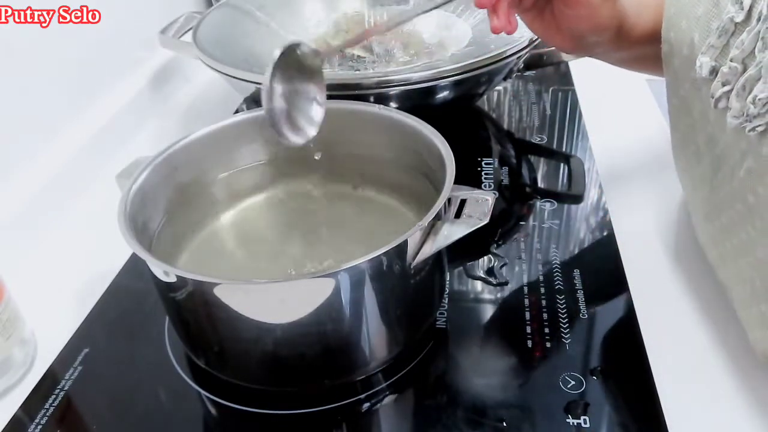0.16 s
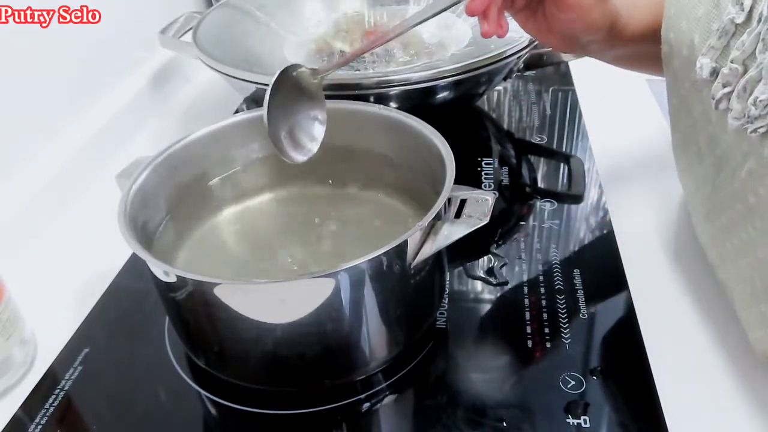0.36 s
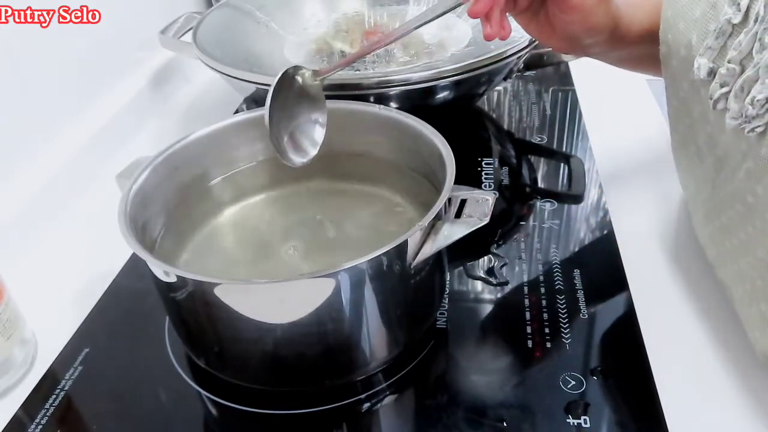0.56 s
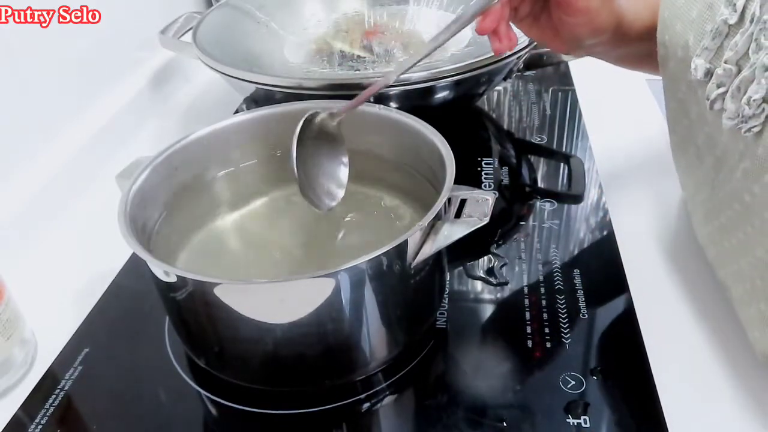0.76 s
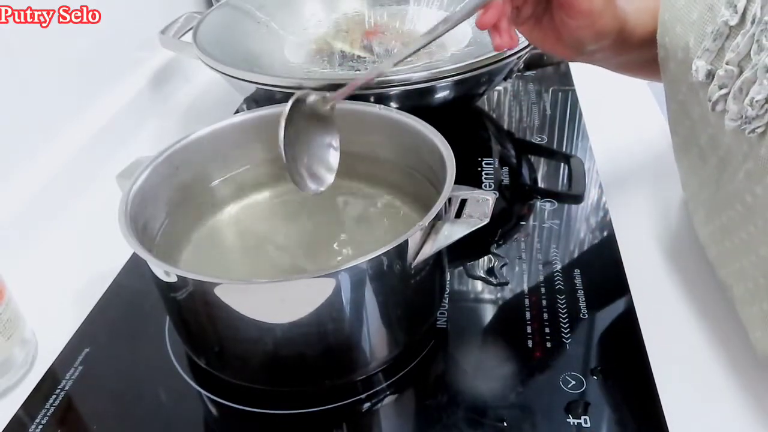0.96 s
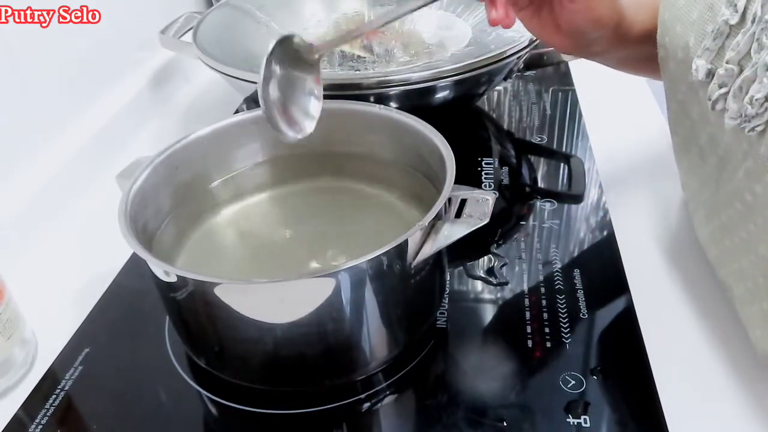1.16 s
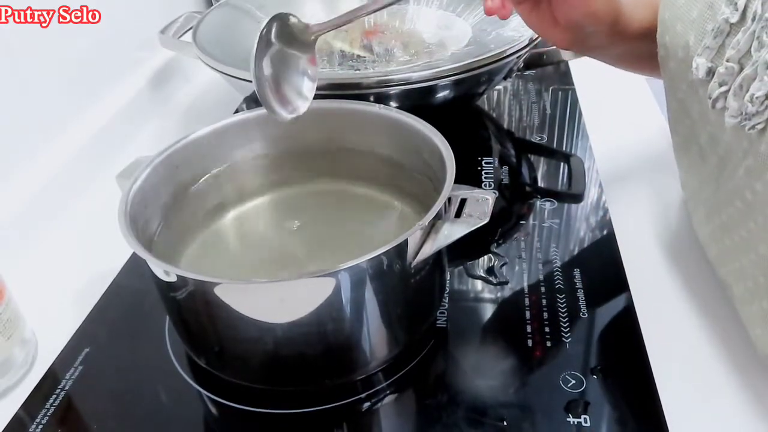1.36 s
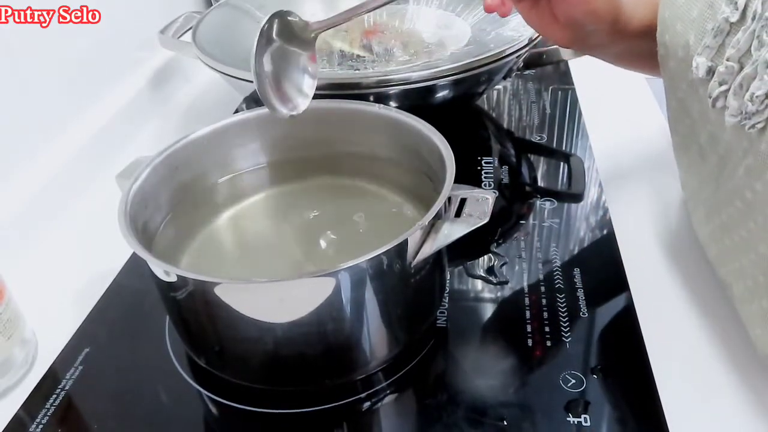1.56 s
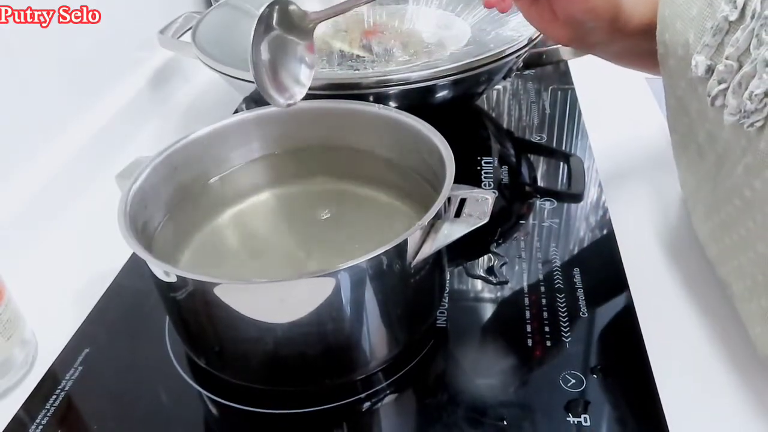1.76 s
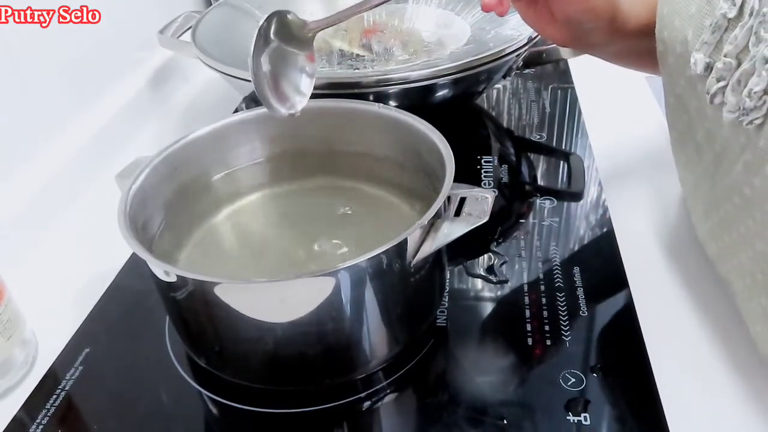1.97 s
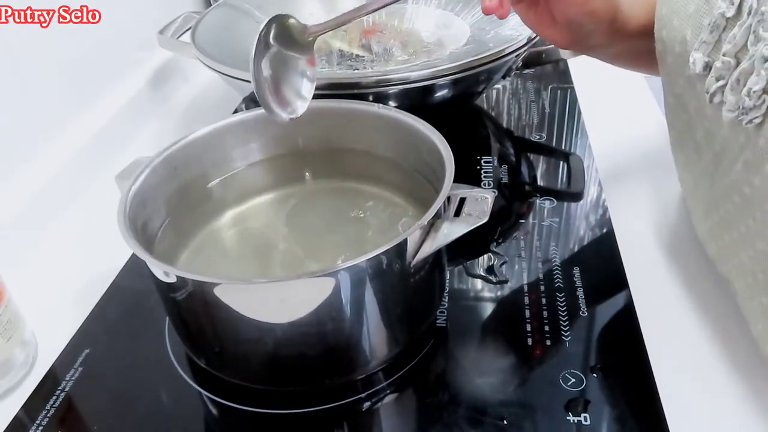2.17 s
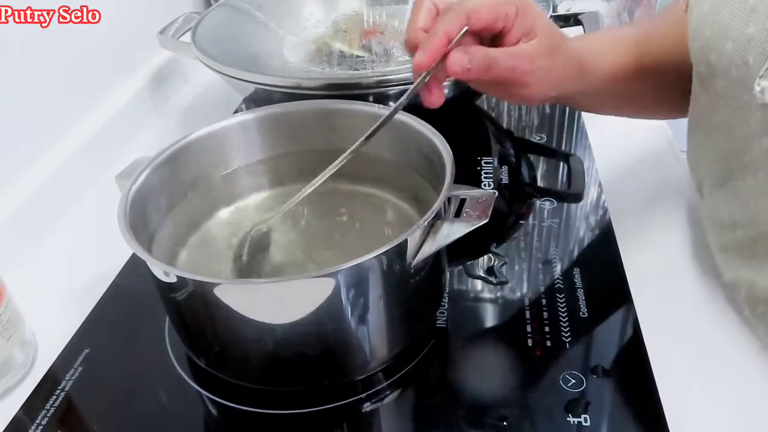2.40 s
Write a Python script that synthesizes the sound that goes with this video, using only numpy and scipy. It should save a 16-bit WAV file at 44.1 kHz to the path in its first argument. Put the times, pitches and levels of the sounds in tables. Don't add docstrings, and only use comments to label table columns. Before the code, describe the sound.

Low continuous hum from a cooking hob, fans and a motor fills a small indoor kitchen, with dull air rumble and light hiss. A knock tail, one sharp tick on the worktop, then a tiny crackle, picked up nearby.

```python
import sys
import numpy as np
from scipy import signal
from scipy.fft import rfft, irfft, next_fast_len
from scipy.io import wavfile
from scipy.ndimage import uniform_filter1d, map_coordinates

SR = 44100
rng = np.random.default_rng(int(sys.argv[2]) if len(sys.argv) > 2 else 0)


def store_pcm(level_fs):
    pcm = np.round(np.clip(level_fs, -1, 1) * 32767).astype(np.int16)
    wavfile.write(sys.argv[1], SR, np.atleast_2d(pcm).T)


def magnitude_from_level(level_db):
    exponent = np.asarray(level_db, float) / 20
    return 10 ** exponent


N = 107427
TIME = np.arange(N) / SR
HIT_TIME = np.arange(SR // 2) / SR

MOTOR_OVERTONES = {1: -46.7, 2: -32.6, 3: -36.6, 4: -55, 7: -65, 8: -45.5, 9: -53.3, 10: -55, 12: -63, 15:
                   -63, 20: -60, 21: -65.5, 25: -71}
FAN_OVERTONES = {1: -26.4, 2: -67, 3: -61.5, 4: -57.5, 5: -66, 6: -68, 7: -69, 8: -62, 9: -66}
SMALL_FAN_OVERTONES = {1: -70.5, 2: -59, 3: -49.5}
COIL_OVERTONES = {1: -44.7, 5: -67, 9: -62.5, 10: -67.5, 12: -71.5, 13: -68, 15: -69, 20: -67.6, 23: -71.5,
                  24: -72, 26: -76, 28: -76.5, 46: -83.1, 57: -82.9}
# f/Hz, level/dB rms, lead/s
FAR_MACHINES = [(104.554, -44.2, .005), (94.65, -50, .00425), (142, -53.3, .0054), (153.59, -53.5, .0003),
                (107.8, -55, .0079), (82.7, -57, .001), (87, -57, .0001), (54.8, -57, .0064),
                (471, -59, .001), (693.9, -64, .001)]
# f/Hz, level/dB per Hz
AIR_RUMBLE = [(16, -77), (33, -78), (52, -61.5), (75, -70), (100, -66), (145, -70), (170, -66.5),
              (240, -87)]
# f/Hz, level/dB per Hz
AIR_BODY = [(150, -100), (230, -81), (290, -72), (800, -73.5), (1300, -82), (2400, -85.5), (3600, -104),
            (8000, -140)]
# f/Hz, width/Hz, level/dB
DUCT_BUMPS = [(461, 44, 8.5), (595, 72, 3.5), (510, 19, -5), (365, 24, -4), (419, 22, -0.5)]
# f/Hz, level/dB per Hz
AIR_HISS = [(1000, -110), (3500, -101), (5300, -100), (7800, -105), (10000, -110), (13000, -114),
            (15000, -120), (15800, -128)]
# f/Hz, side over mid level/dB
AIR_WIDTH = [(170, -43.5), (240, -6.5), (460, -16), (900, -9), (2100, -10), (3500, -2.5), (9000, -3),
             (15000, 0.5)]
# f/Hz, level/dB, t60/s
KNOCK_MODES = [(272.3, -22, 0.11), (276.3, -31, 0.49), (291.4, -31.5, 0.33), (486, -30.5, 0.099),
               (834, -36.5, 0.23), (886, -34, 0.086), (1993, -34, 0.11), (1870, -36.5, 0.097),
               (2060, -39.5, 0.093)]
# f/Hz, level/dB, t60/s
TICK_MODES = [(2105, -36, .03), (2380, -32, .03), (2490, -16.5, .03), (2780, -34, .015), (3050, -18, .006),
              (3700, -42, .04)]
# t/s, peak level/dB, centre f/Hz, t60/s
CRACKLE_BURSTS = [(.098, -34, 3500, .045), (.098, -43, 6300, .04), (.098, -51, 11500, .045),
                  (.7932, -38, 5900, .005), (.7932, -34, 4000, .004), (.7985, -59, 14000, .015),
                  (.800, -59, 10000, .02), (.813, -48, 5800, .008), (.829, -55, 14500, .015),
                  (.831, -57, 10800, .07), (.855, -64, 14000, .06), (.265, -54, 5100, .03),
                  (.0977, -41, 8700, .008), (.098, -45, 4800, .04)]


def unit(x):
    return x / np.sqrt(np.mean(x ** 2) + 1e-20)


def along(points, hz):
    f, v = np.transpose(points)
    return np.interp(np.log(hz + 1), np.log(f + 1), v)


def wobble(rate):
    knots = rng.standard_normal(int(N * rate / SR) + 4)
    return map_coordinates(knots, [np.arange(N) * rate / SR])


def filtered(x, response):
    m = next_fast_len(x.shape[-1] + 8192)
    spectrum = rfft(x, m) * response(np.fft.rfftfreq(m, 1 / SR))
    return irfft(spectrum, m)[..., :x.shape[-1]]


def hum(turns, overtones, unsteady_db):
    total = 0
    for order, db in overtones.items():
        level_db = db + unsteady_db * np.sqrt(order) * wobble(2.3)
        phase = rng.random() * (order > 3)
        total = total + np.sqrt(2) * magnitude_from_level(level_db) * np.cos(2 * np.pi * (order * turns + phase))
    return total


def compressor_motor():
    motor_hz, lead_s = 48.867, .01599
    return -hum(motor_hz * (TIME + lead_s), MOTOR_OVERTONES, .25)


def fans():
    fan_hz, lead_s, sag_hz_per_s = 124.061, .00463, .095
    small_hz, small_sag_hz_per_s = 217.0, .08
    turns = fan_hz * (TIME + lead_s) - sag_hz_per_s * TIME ** 2 / 2
    small_turns = small_hz * TIME - small_sag_hz_per_s * TIME ** 2 / 2 + .01 * wobble(8)
    return hum(turns, FAN_OVERTONES, .1) + hum(small_turns, SMALL_FAN_OVERTONES, 0.8)


def coil():
    coil_hz, lead_s = 100.03, .00078
    comb = {}
    for order in range(11, 80):
        if order not in COIL_OVERTONES:
            comb[order] = -77 - .26 * order + 4 * rng.standard_normal()
    return hum(coil_hz * (TIME + lead_s), COIL_OVERTONES, 0.18) + hum(coil_hz * TIME, comb, 0)


def far_machines():
    return sum(hum(hz * (TIME + lead), {1: db}, 0.37) for hz, db, lead in FAR_MACHINES)


def air_level(hz):
    bumps_db = sum(db * np.exp(-((hz - centre) / width) ** 2) for centre, width, db in DUCT_BUMPS)
    rumble = magnitude_from_level(along(AIR_RUMBLE, hz)) * (hz < 300)
    body = magnitude_from_level(along(AIR_BODY, hz) + bumps_db) * (hz > 100)
    hiss = magnitude_from_level(along(AIR_HISS, hz)) * (hz > 900)
    return np.hypot(rumble, body + hiss)


def air():
    z = signal.stft(rng.standard_normal((2, N)), nperseg=512)[2]
    patches = uniform_filter1d(rng.standard_normal(z.shape[1:]), 5, 0)
    patches = unit(uniform_filter1d(patches, 10, 1))
    noise = signal.istft(z * magnitude_from_level(1.1 * patches), nperseg=512)[1][:, :N]
    noise = unit(noise) * np.sqrt(SR / 2)
    noise = noise * magnitude_from_level(.3 * wobble(2.3))
    mid, side = filtered(noise, lambda hz: air_level(hz) * [hz ** 0, magnitude_from_level(along(AIR_WIDTH, hz))])
    return np.array([mid + side, mid - side])


def ring(modes, t, rise_s):
    total = sum(magnitude_from_level(db - 60 * t / t60) * np.sin(2 * np.pi * hz * t) for hz, db, t60 in modes)
    return total * (1 - np.exp(-t / rise_s))


def placed(sound, start_s):
    out = np.zeros((2, N + SR))
    start = round(start_s * SR)
    out[:, start:start + len(HIT_TIME)] = sound
    return out[:, :N]


def knock():
    return placed(ring(KNOCK_MODES, HIT_TIME + 0.0041, 0.0015), 0)


def crack_band(f):
    return (1j * f / (2500 + 1j * f)) ** 2 / (1 + 1j * f / 18000 - (f / 12500) ** 2) ** 2


def room_tail():
    t60, dull_hz = .1, 4000
    a, b = rng.standard_normal((2, len(HIT_TIME))) * magnitude_from_level(-60 * HIT_TIME / t60) * (HIT_TIME > .002)
    scatter = np.array([a + .5 * b, a - .5 * b]) / np.linalg.norm(a)
    return filtered(scatter, lambda f: 1 / (1 + 1j * f / dull_hz))


def tick():
    crack_db, crack_t60, room_db = -33, .004, -11
    crack = magnitude_from_level(crack_db - 60 * HIT_TIME / crack_t60) * rng.standard_normal(len(HIT_TIME))
    direct = ring(TICK_MODES, HIT_TIME, .0022) + filtered(crack, crack_band)
    room = signal.fftconvolve(direct[None], room_tail(), axes=1)[:, :len(HIT_TIME)]
    return placed(direct + magnitude_from_level(room_db) * room, .0976)


def crackles():
    q = 1.8
    out = np.zeros((2, N))
    for start_s, db, hz, t60 in CRACKLE_BURSTS:
        def band(f):
            slope = 1j * f * hz / q
            return (slope / (hz * hz - f * f + slope)) ** 3

        a, b = rng.standard_normal((2, len(HIT_TIME))) * magnitude_from_level(db - 60 * HIT_TIME / t60)
        burst = np.array([a + 1.0 * b, a - .8 * b])
        out += placed(2 * filtered(burst, band), start_s)
    return out


def scene():
    machines = compressor_motor() + fans() + coil() + far_machines()
    return machines + air() + knock() + tick() + crackles()


def roll_off(x):
    return signal.sosfilt(signal.butter(12, 15720, fs=SR, output="sos"), x)


def record(dry):
    mix = dry + 0.00035
    return roll_off(mix)


dry = scene()
out = record(dry)
store_pcm(out)
```